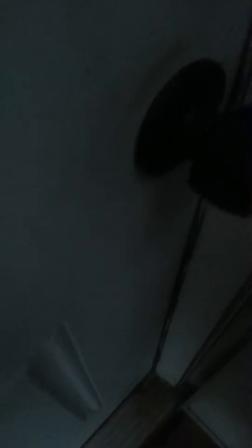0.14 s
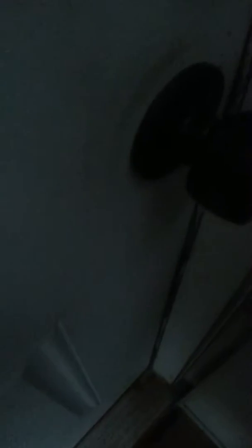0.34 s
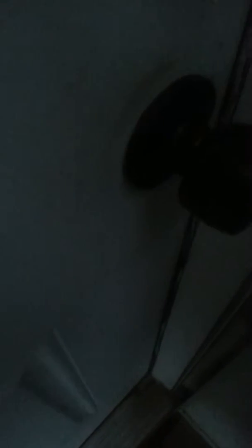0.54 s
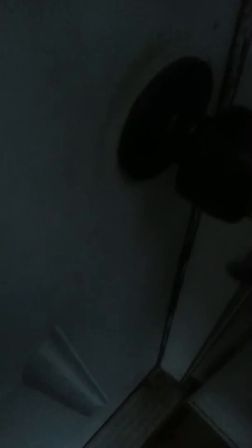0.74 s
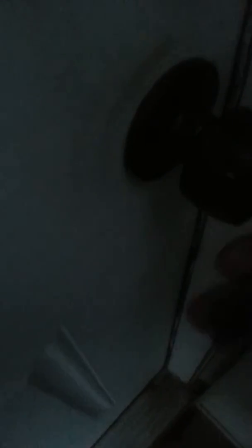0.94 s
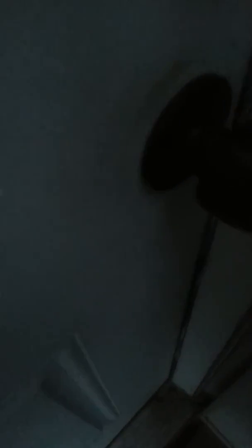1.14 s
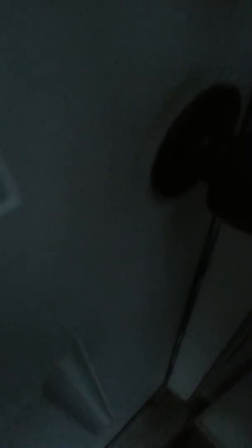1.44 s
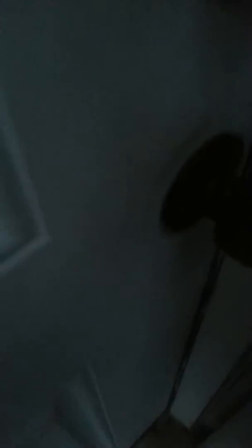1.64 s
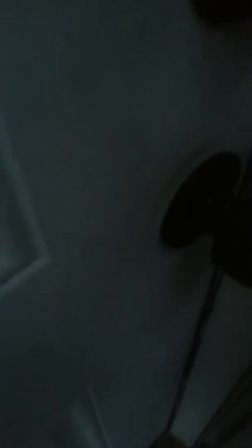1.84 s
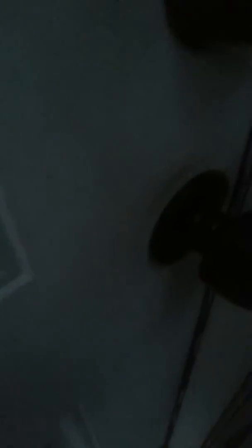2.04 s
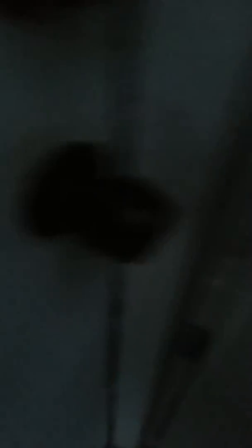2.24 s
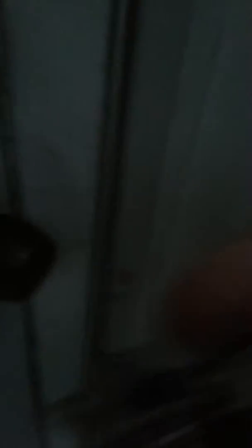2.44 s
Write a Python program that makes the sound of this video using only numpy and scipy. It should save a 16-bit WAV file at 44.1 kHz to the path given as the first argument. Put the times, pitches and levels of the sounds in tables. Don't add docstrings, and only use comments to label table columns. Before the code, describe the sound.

A bunch of keys clinks and rattles against a lock plate, damped by fingers at first, with dull door knocks, then swings free and rings brightly; close hand-held stereo microphone in a quiet hallway.

```python
import sys
import numpy as np
from scipy import signal
from scipy.io import wavfile

SR = 44100
rng = np.random.default_rng(int(sys.argv[2]) if len(sys.argv) > 2 else 0)


def amplitude_ratio(level_db):
    exponent = np.asarray(level_db, float) / 20
    return 10 ** exponent


def to_wav(sig):
    pcm = np.clip(np.atleast_2d(sig), -1, 1) * 32767
    pcm = np.round(pcm).astype(np.int16)
    wavfile.write(sys.argv[1], SR, pcm.T)


N = 114660

# (time [s], peak [dB], treble [dB], ping [Hz])
LOCK_CLINKS = [(0.1024, -27, -29, 6600), (0.2114, -3.5, -16, 6880), (0.3159, -26, -52, 7060),
               (0.3285, -16, -35, 6630), (0.378, -0.5, -5, 6860), (0.3924, -8, -19, 6840),
               (0.415, -46, -21, 6490), (0.4354, -15, -26, 6940), (0.4429, -14, -5, 5420),
               (0.5037, -24, -22, 6700), (0.5835, -11, -13, 6700), (0.5891, -18, -25, 5400),
               (0.597, -7.5, -9, 7070), (0.6197, -10.5, -6, 6460), (0.6548, -5, -13, 7040),
               (0.6675, -6.5, -8, 6900), (0.6793, -6.5, -11, 6440), (0.6915, -15, -29, 6400),
               (0.7023, -7, -3, 7400), (0.7146, -0.5, -18, 6820), (0.7205, -12, -7, 6800),
               (0.7313, -6, -12, 3990), (0.7548, -7.5, -10.5, 6200), (0.7806, -17, -15, 6840),
               (0.8219, -20, -11, 6600)]
# (time [s], peak [dB], treble [dB], ping [Hz])
TURN_CLINKS = [(0.8668, -15, -13, 5570), (0.875, -17.5, -17, 7110), (0.8987, -17, -3, 6870),
               (0.9127, -8, -14, 6540), (0.9185, -6.5, -6, 5720), (0.9238, -30, -17, 6500),
               (0.9322, -9, -4, 6720), (0.944, -9, -3, 7000), (0.9605, -19, -2, 7770),
               (0.9664, -10, -2, 8000), (0.99, -12, 0, 6840), (0.999, -9.5, 0.5, 7100),
               (1.0224, -13, -24, 7070), (1.0288, 0.5, -5, 11900), (1.0365, -7.5, 5, 6860),
               (1.046, -14, -11, 6660), (1.0549, -4.5, -23, 7060), (1.0693, -6, 0.5, 7560),
               (1.0796, -26, -10, 7250), (1.1037, -9, 2, 13200), (1.1112, -11.5, -4, 9660),
               (1.1444, -12, -23, 4200), (1.1699, -0.5, -7.5, 6290), (1.177, -12, -30, 6090),
               (1.2176, -10, -36, 7270), (1.2699, -23, -25, 4600), (1.2902, -19, -23, 5500),
               (1.3131, -13.5, -20, 7600), (1.3199, -3, -11, 5080), (1.335, -0.5, -6, 4120),
               (1.3497, -1, -26, 7420), (1.3718, -7.5, -13, 7160), (1.4183, -15, -19, 5050),
               (1.4267, -11, -29, 5460), (1.488, -34, -29, 6700), (1.5309, -23, -21, 6930),
               (1.5632, -17, -16, 7220), (1.5765, -14.5, -16, 7400), (1.587, -10.5, -7, 7140)]
# (time [s], peak [dB], treble [dB], ping [Hz])
SWING_CLINKS = [(1.613, -16, -23, 5540), (1.6249, -13.5, -15, 5530), (1.6323, -6, -10, 6650),
                (1.6635, -9.5, -9, 7460), (1.6852, -7, -4, 5570), (1.7048, -3.5, -2.5, 12500),
                (1.7268, -6, -17, 12130), (1.7664, -11, -10, 6950), (1.8238, -10, -17, 7010),
                (1.84, 1.5, -8, 5220), (1.8448, -11, -18, 5380), (1.8671, -8.5, -5.5, 7000),
                (1.8872, -26, -3, 6850), (1.898, -4, -4.5, 6970), (1.906, -13, 0.5, 6870),
                (1.927, -12.5, 3, 9800), (1.9596, -24, 11, 6900), (1.9685, -8.5, -2.5, 7300),
                (1.9921, -20, 10, 11700), (2.016, -13.5, 6.5, 10000), (2.0424, -11.5, -1, 12000),
                (2.0623, -3.5, 0, 7140), (2.084, -11.5, 8, 10080), (2.0932, -12.5, 4, 11810),
                (2.099, -7.5, 0, 11200), (2.1144, -11.5, -10, 7800), (2.128, -7, -10.5, 6500),
                (2.1575, 0.5, -20, 7150), (2.1934, -13.5, -10, 6700), (2.2367, -9.5, -12, 6100),
                (2.2797, 2.5, -1.5, 5820), (2.3225, -4.5, -25, 6960), (2.3431, -16.5, -15, 5230),
                (2.5247, -26, -16, 6640), (2.5509, -18.5, -16, 6850), (2.5837, -28, -4, 7000)]
# (time [s], shaking [dB], ring of large key [dB], ring of loose keys [dB])
SHAKING = [(0, -52, -27, -33), (.55, -46.5, -11, -24), (.62, -37, 4.5, -10), (.76, -45, -5, 3.5),
           (.82, -44, -21, -16), (.93, -32, 11.5, 2), (1.0, -46, 4, -8), (1.15, -24.5, -5, -9.5),
           (1.25, -55.5, -34, -44), (1.4, -33.5, -23, -30), (1.5, -49.5, 0.5, -2), (1.73, -65.5, -2, -2),
           (1.77, -26, -2.5, 2.5), (2.1, -30, -2.5, 3.5), (2.23, -35.5, 2.5, -1), (2.38, -46, -17, -25),
           (2.46, -33.5, -27, -23), (2.6, -51, -10, -18)]
# (frequency [Hz], density [dB per Hz])
CRACK_SPECTRUM = [(880, -27), (1500, -10.5), (1930, -8.5), (2940, -12), (3440, -8.5), (6960, 2.5),
                  (8540, -9.5), (13500, 1), (15500, -3.5)]


def rms_one(x):
    return x / np.sqrt(np.mean(x ** 2) + 1e-20)


def at_hz(points, hz):
    table_hz, table_db = np.array(points).T
    return np.interp(np.log(hz), np.log(table_hz), table_db)


def train(s, gains):
    out = np.full(N, 1e-18)
    np.add.at(out, np.clip((s * SR).astype(int), 0, N - 1), gains)
    return out


def ring(clicks, hz, t60):
    r, w = amplitude_ratio(-60 / (t60 * SR)), 2 * np.pi * hz / SR
    return signal.lfilter([0, np.sin(w)], [1, -2 * r * np.cos(w), r * r], clicks)


def fade(clicks, t60):
    return signal.lfilter([1], [1, -amplitude_ratio(-60 / (t60 * SR))], clicks)


def drift(hz):
    lowpass = signal.butter(2, hz, fs=SR / 20, output="sos")
    slow = signal.sosfilt(lowpass, rng.standard_normal((2, N // 20 + 2)))
    return np.array([np.interp(np.arange(N) / 20, np.arange(len(v)), rms_one(v)) for v in slow])


def pair(hz):
    # (frequency [Hz], difference [dB])
    side_lean = [(60, -1), (250, -1.5), (2000, 3), (4000, 7), (8000, -14.5), (14000, 0.5)]
    return amplitude_ratio(at_hz(side_lean, hz) * np.array([[.5], [-.5]]))


def bands(spectrum, envelope):
    # (frequency [Hz], share [0-1])
    side_likeness = [(60, 1), (250, 0.82), (1000, 0.52), (8000, 0.057)]
    limits = 28 * 2 ** np.arange(0, 9.6, .5)
    limits = limits[(limits > spectrum[0][0] * .8) & (limits < 21000)]
    out, power, white = 0, 0, rng.standard_normal((2, 2, N))
    for k, (low, high) in enumerate(zip(limits, limits[1:])):
        hz = np.sqrt(low * high)
        if low > spectrum[-1][0]:
            break
        mid, side = signal.sosfilt(signal.butter(2, [low, high], "band", fs=SR, output="sos"), white[k % 2])
        alike = np.clip(at_hz(side_likeness, hz), 0, 1)
        gain = amplitude_ratio(at_hz(spectrum, hz))
        power += 2 * gain ** 2 * np.mean(mid ** 2)
        stereo = np.sqrt(1 + alike) * mid + np.sqrt(1 - alike) * side * [[1], [-1]]
        out = out + gain * envelope(hz) * pair(hz) * stereo
    return out / np.sqrt(power)


def hush():
    # (frequency [Hz], density [dB per Hz])
    hush_spectrum = [(25, -10.5), (99, 11), (1050, -11), (2170, -16), (5280, -14.5), (12500, -34),
                     (15500, -71)]
    lowpass = signal.butter(2, 9000, fs=SR, output="sos")
    return signal.sosfilt(lowpass, bands(hush_spectrum, lambda hz: 1))


def contacts():
    touches_per_s, rattle_db, rattle_spread_db, rattle_ring_db = 700, -4.5, 3.5, 11
    bounce_s, bounce_loss_db = .002, 9
    s, shake_db = np.transpose(SHAKING)[:2]
    draw = rng.random((int(N / SR * touches_per_s), 2))
    when = draw[:, 0] * N / SR
    spread_db = -rattle_spread_db * np.log(np.maximum(draw[:, 1], .05))
    db = np.interp(when, s, shake_db) + rattle_db + spread_db
    small = np.stack([when, db, np.full_like(db, -8.0)], axis=1)

    clinks = np.vstack([LOCK_CLINKS, TURN_CLINKS, SWING_CLINKS])[:, :3]
    luck = rng.exponential(1, (len(clinks), 4))
    late = bounce_s * np.cumsum(.5 + np.minimum(luck[:, :2], 2), axis=1)
    loss_db = bounce_loss_db * (.5 + luck[:, 2:])
    bounces = []
    for k in range(2):
        bounce = clinks.copy()
        bounce[:, 0] += late[:, k]
        bounce[:, 1] -= loss_db[:, k]
        bounces.append(bounce)

    when, db, treble_db = np.vstack([clinks, *bounces, small]).T
    ring_db = rattle_ring_db * (np.arange(len(db)) >= len(db) - len(small))
    return when, db, treble_db, ring_db


def contact_luck(s, count):
    return np.clip(rng.standard_normal((len(s), count)), -2, 1.4)


def contact_db(db, treble_db, hz):
    return db + (treble_db + 8) * (hz > 9000)


def cracks(s, db, treble_db):
    crack_db, tail_db, band_spread_db = -6, -12, 3
    crack_t60_s, rise_s, tail_t60_s = .005, .0004, .067
    luck = contact_luck(s, 10)

    def envelope(hz):
        band = int(np.log2(hz) * 2) - 20
        clicks = train(s, amplitude_ratio(contact_db(db, treble_db, hz) + crack_db + band_spread_db * luck[:, band]))
        shorter = 2 if hz > 9000 else 1
        crack = fade(clicks, crack_t60_s / np.sqrt(shorter)) - fade(clicks, rise_s * np.log(1000))
        return 2 * crack + amplitude_ratio(tail_db) * fade(clicks, tail_t60_s / shorter)

    return bands(CRACK_SPECTRUM, envelope)


def pings():
    ping_db, t60_s, rise_s = -5, .019, .0004
    out, t = np.zeros((2, N + SR)), np.arange(2000) / SR
    for s, db, _, hz in np.vstack([LOCK_CLINKS, TURN_CLINKS, SWING_CLINKS]):
        i = int(s * SR)
        phase = rng.uniform(0, 2 * np.pi, (2, 1))
        decay = amplitude_ratio(db + ping_db - 60 * t / t60_s) * (1 - np.exp(-t / rise_s))
        out[:, i:i + len(t)] += pair(hz) * decay * np.sin(2 * np.pi * hz * t + phase)
    return out[:, :N]


def lock_plate(s, db, treble_db):
    plate_modes = [3480, 4120, 4550, 5200, 5680, 6280, 7200, 8100]
    plate_db, spread_db, cycles = -19.5, 6, 81
    luck = contact_luck(s, len(plate_modes))
    out = np.zeros((2, N))
    for k, hz in enumerate(plate_modes):
        mode_db = contact_db(db, treble_db, hz) + plate_db + at_hz(CRACK_SPECTRUM, hz) / 2
        for port in range(2):
            gains = amplitude_ratio(mode_db + spread_db * luck[:, k]) * np.sign(rng.standard_normal(len(s)))
            out[port] += pair(hz)[port] * ring(train(s, gains), hz, cycles / hz)
    return out


def ringing_keys(s, db, treble_db, ring_db):
    # (frequency [Hz], level [dB])
    key_modes = [(4400, -14), (4955, -11), (5560, -11), (6600, -2), (6760, 2), (6890, -3), (7090, -6),
                 (7840, -8), (9600, -11), (10050, -8), (11330, -5), (11780, -5), (12430, -8), (13800, -11)]
    mode_spread_db, twin_share, cycles = 4, .03, 900
    turning_db, turning_hz, waver_hz, waver_share = 5.5, 12, 40, .45
    modes = [(hz, level_db) for hz, level_db in key_modes]
    modes += [(hz * (1 + twin_share * rng.uniform(-1.016, 1)), level_db) for hz, level_db in key_modes[7:]]
    when, _, large_db, loose_db = np.transpose(SHAKING)
    luck = contact_luck(s, len(modes))
    out = 0
    for k, (hz, level_db) in enumerate(modes):
        hanging_db = large_db if 6000 < hz < 7500 else loose_db
        free_db = np.interp(np.arange(N) / SR, when, hanging_db)
        strike_db = contact_db(db, treble_db, hz) + ring_db + level_db - 25
        gains = amplitude_ratio(strike_db + mode_spread_db * luck[:, k]) * np.sign(rng.standard_normal(len(s)))
        swell = amplitude_ratio(free_db + turning_db * drift(turning_hz)[0])
        waver = np.sqrt(1 - waver_share) + np.sqrt(waver_share) * drift(waver_hz)
        out = out + pair(hz) * swell * waver * ring(train(s, gains), hz, cycles / hz)
    return out


def keys():
    s, db, treble_db, ring_db = contacts()
    brief = cracks(s, db, treble_db) + pings() + lock_plate(s, db, treble_db)
    return brief + ringing_keys(s, db, treble_db, ring_db)


def door():
    # (time [s], peak [dB], hardness [dB])
    knocks = [(0.212, -11.5, -21), (0.325, -25, -6.5), (0.374, -17.5, -17.5), (0.433, -16.5, -19),
              (0.586, -17, -8.5), (0.596, -12.5, -14.5), (0.627, -16, -17.5), (0.716, -11, -18.5),
              (0.731, -10.5, -10), (0.765, -24.5, -44), (0.867, -20.5, -6.5), (1.05, -21.5, -3.5),
              (1.118, -19, -8), (1.147, -12, -15.5), (1.172, -19, -9.5), (1.318, -15, -4.5),
              (1.374, -19.5, 0.5), (1.387, -16, -45), (1.571, -14.5, -18.5), (1.615, -12.5, -21.5),
              (1.649, -9.5, -27.5), (1.681, -7, -26), (1.739, -17.5, -6.5), (2.155, -17, -9),
              (2.236, -23.5, -12)]
    # (frequency [Hz], level [dB])
    leaf_modes = [(98, -8.5), (126, -0.5), (165, 1), (212, -2.5), (255, -8), (298, -9.5), (400, -4),
                  (500, -3), (800, 1), (1050, -34), (1500, -7.5), (1880, -7)]
    # (frequency [Hz], density [dB per Hz])
    thud_spectrum = [(40, -37), (173, 3.5), (1050, 8), (1260, -35), (1840, -2.5), (3000, -4), (3900, -50)]
    leaf_db, leaf_t60_s, leaf_damping, leaf_spread_db = -11.5, .25, .29, 1.77
    thud_db, thud_t60_s, soft_hz = -10, .25, 393
    hard_from_hz, hard_full_hz = 230, 700
    s, db, hard_db = np.transpose(knocks)
    luck = rng.standard_normal((len(s), 2 * len(leaf_modes)))
    soft = np.exp(-2 * np.pi * soft_hz / SR)

    def knock_db(hz):
        reach = np.log(hz / hard_from_hz) / np.log(hard_full_hz / hard_from_hz)
        return db + (hard_db + 12) * np.clip(reach, 0, 1)

    def thud_envelope(hz):
        decay = fade(train(s, amplitude_ratio(knock_db(hz) + thud_db)), thud_t60_s)
        return signal.lfilter([1 - soft], [1, -soft], decay)

    out = bands(thud_spectrum, thud_envelope)
    for k, (hz, level_db) in enumerate(leaf_modes):
        t60 = leaf_t60_s * (100 / hz) ** leaf_damping
        gains = amplitude_ratio(knock_db(hz) + leaf_db + level_db + leaf_spread_db * luck[:, k]) * np.sign(luck[:, -1 - k])
        out = out + pair(hz) * ring(train(s, gains), hz, t60)
    return signal.sosfilt(signal.butter(3, 60, "high", fs=SR, output="sos"), out)


def scene():
    left_lag_s, hush_db, duck_share, duck_from_db = .0005, -36.5, 1, -32
    near = keys() + door()
    near[0] = np.interp(np.arange(N) - np.round(left_lag_s * SR), np.arange(N), near[0])
    shake_db = np.interp(np.arange(N) / SR, *np.transpose(SHAKING)[:2])
    duck_db = duck_share * np.maximum(shake_db - duck_from_db, 0)
    return near + amplitude_ratio(hush_db - duck_db) * hush()


def band_limit(x):
    return signal.sosfilt(signal.butter(12, 15740, fs=SR, output="sos"), x)


def record(dry):
    rounded = 0.75 * np.tanh(dry / 0.93)
    lowpass = signal.cheby2(12, 80, 15900, fs=SR, output="sos")
    return band_limit(signal.sosfilt(lowpass, rounded))


dry = scene()
out = record(dry)
to_wav(out)
```